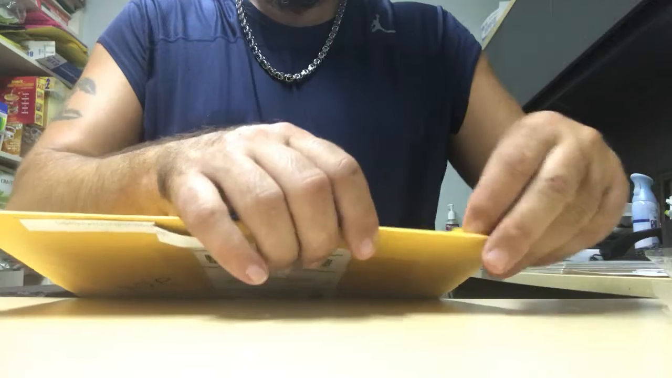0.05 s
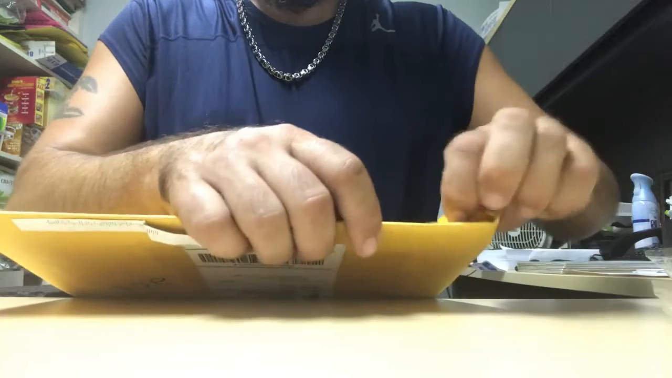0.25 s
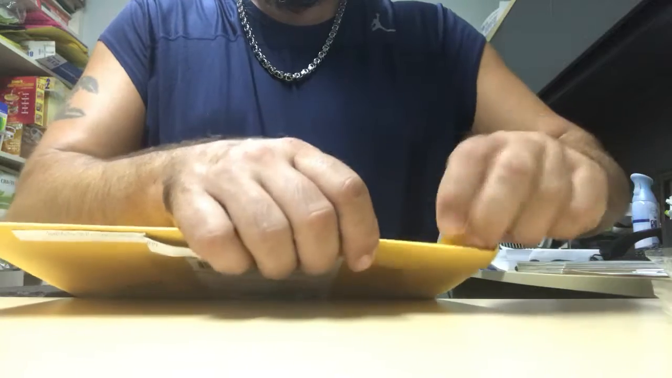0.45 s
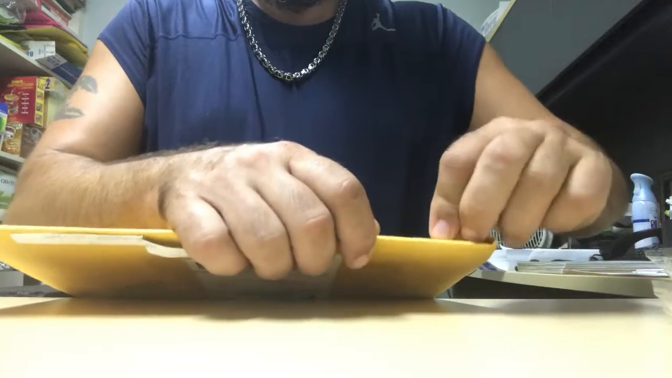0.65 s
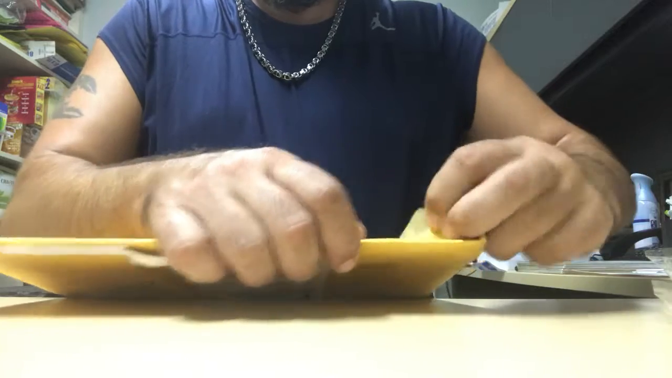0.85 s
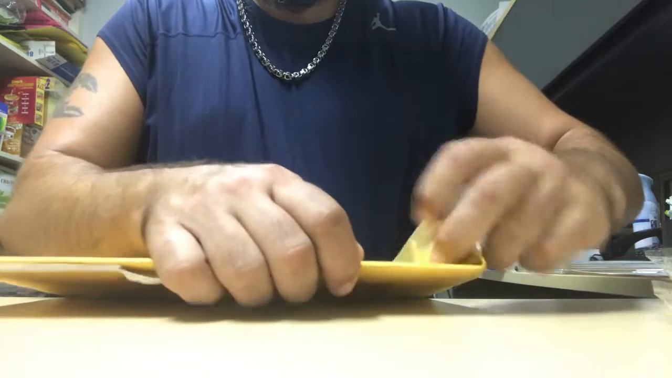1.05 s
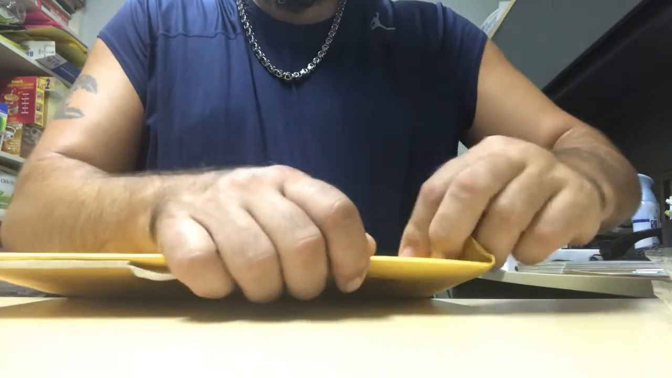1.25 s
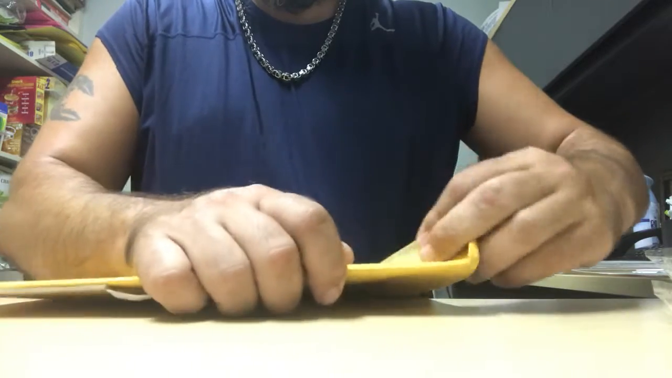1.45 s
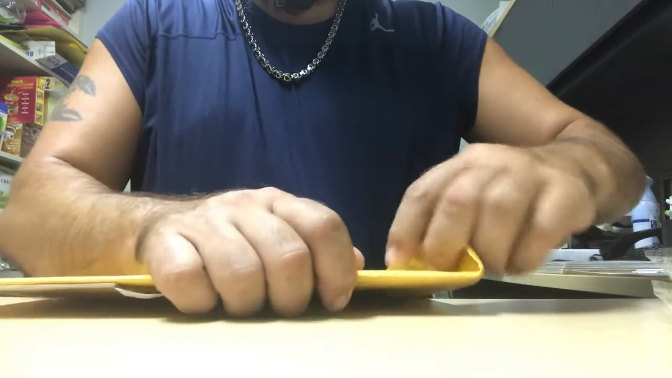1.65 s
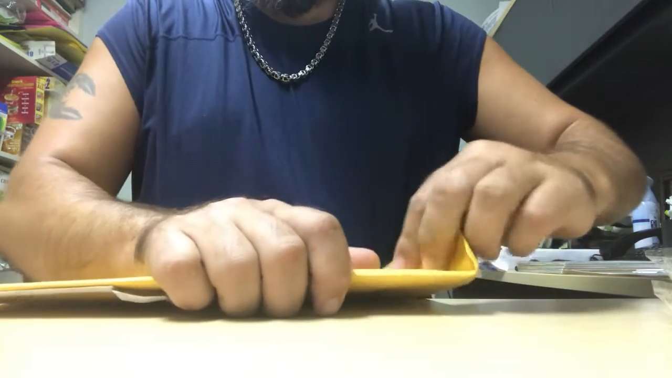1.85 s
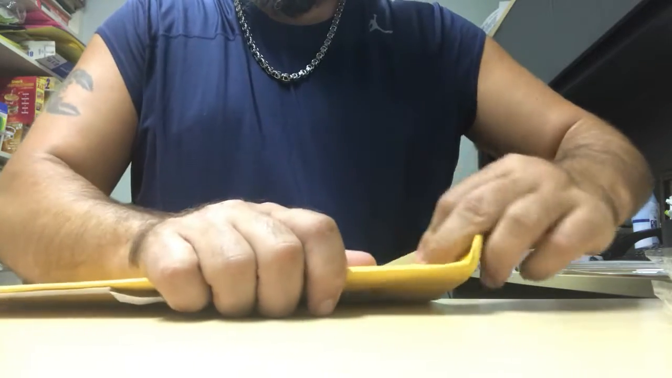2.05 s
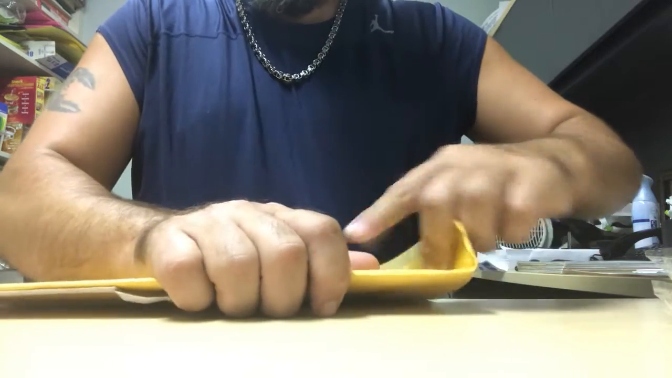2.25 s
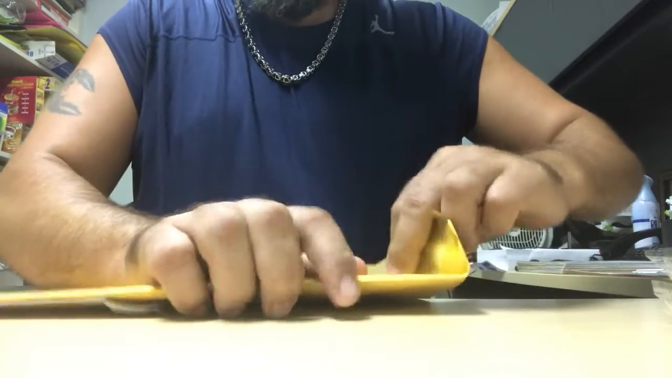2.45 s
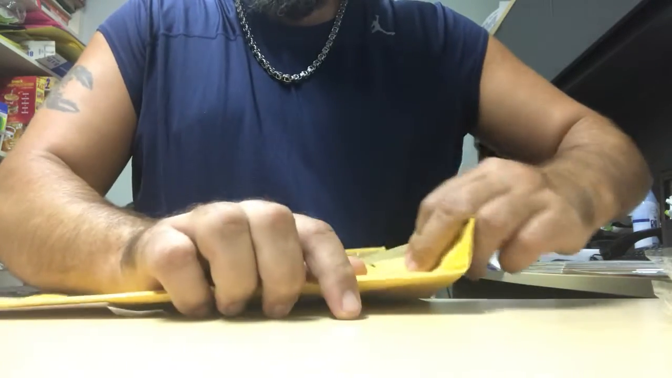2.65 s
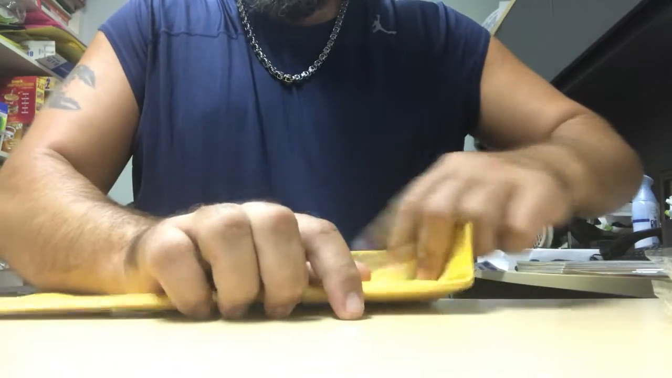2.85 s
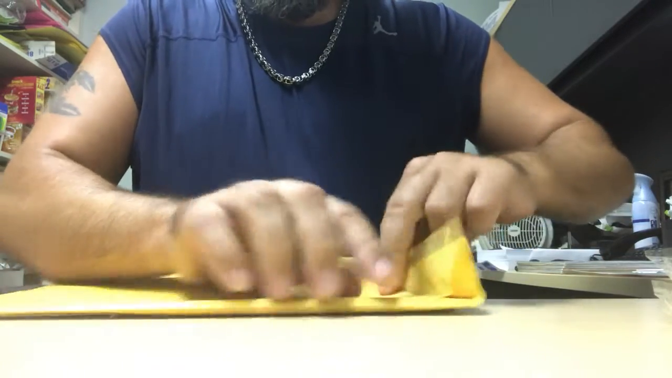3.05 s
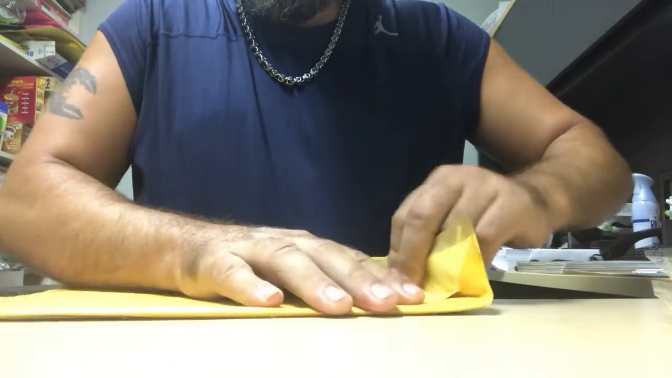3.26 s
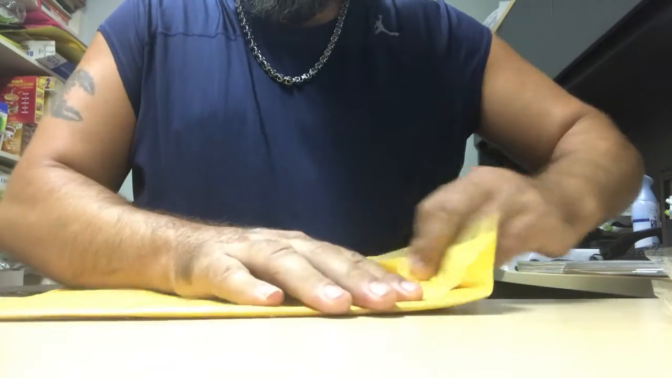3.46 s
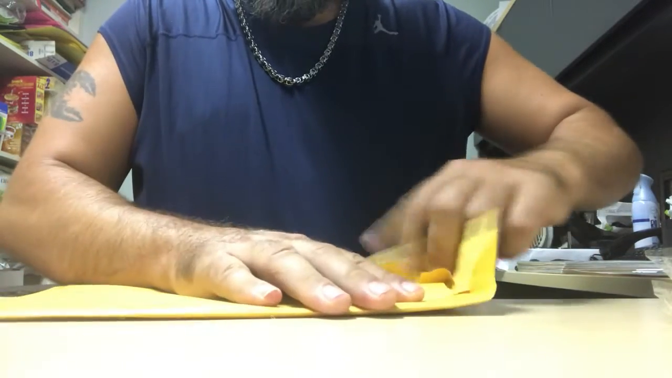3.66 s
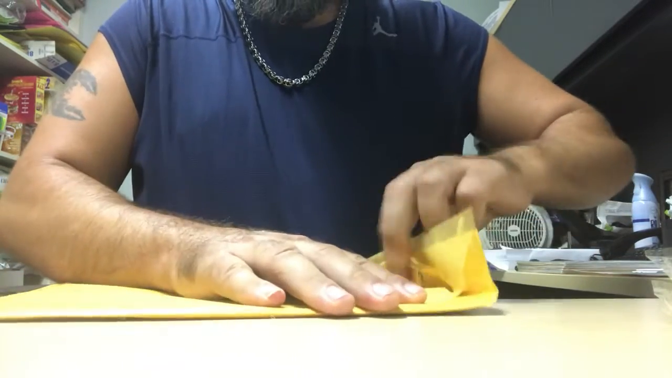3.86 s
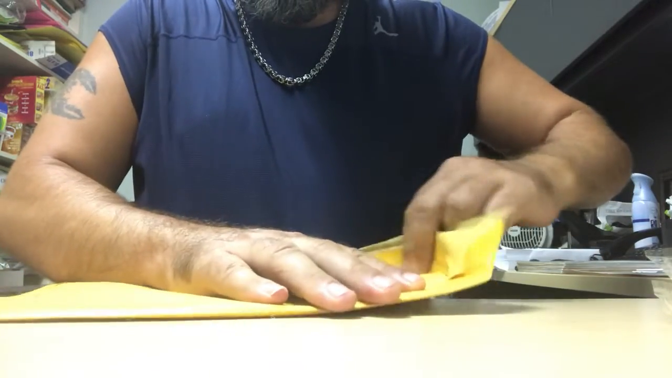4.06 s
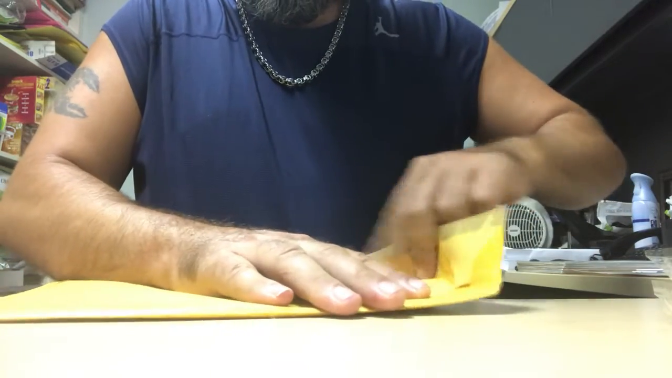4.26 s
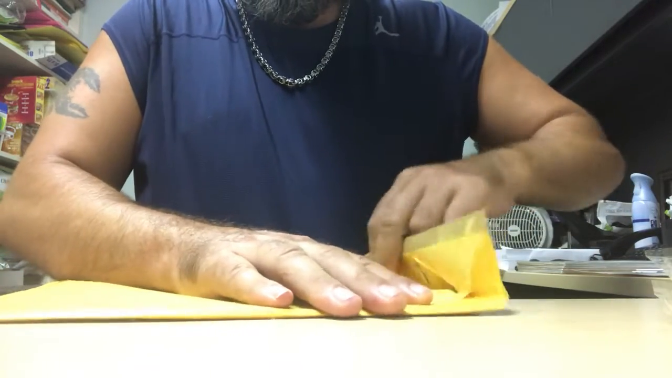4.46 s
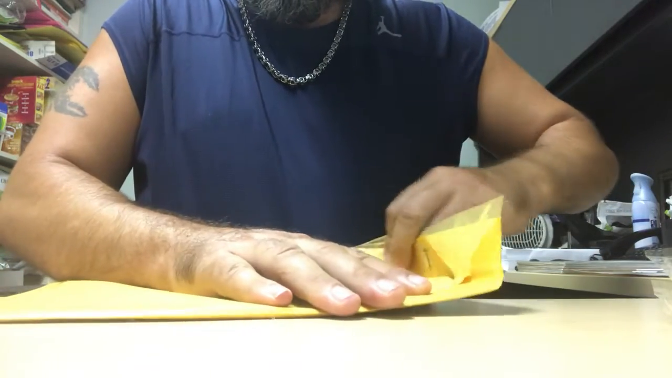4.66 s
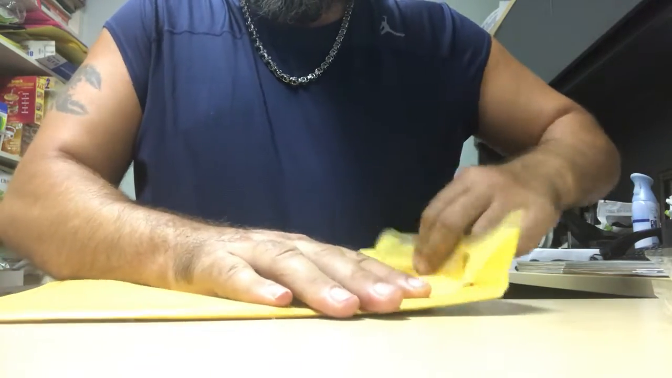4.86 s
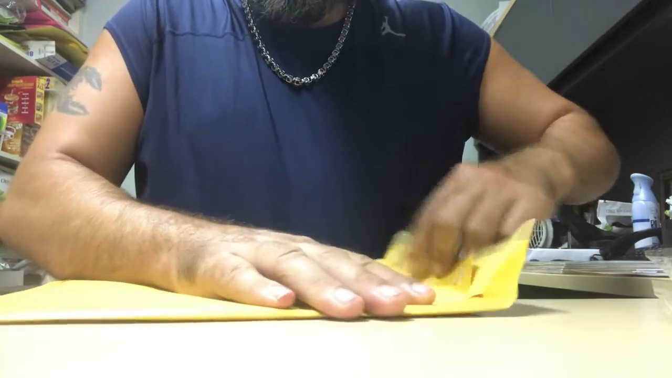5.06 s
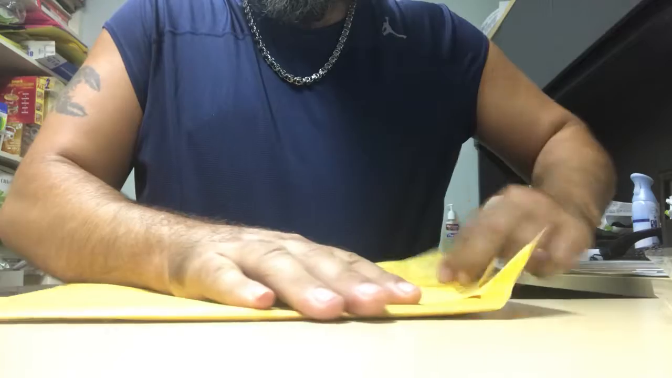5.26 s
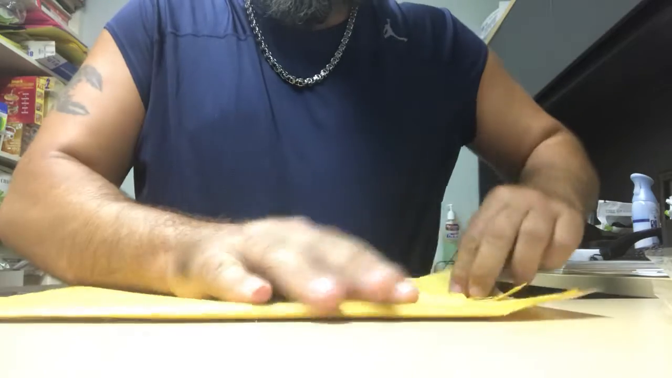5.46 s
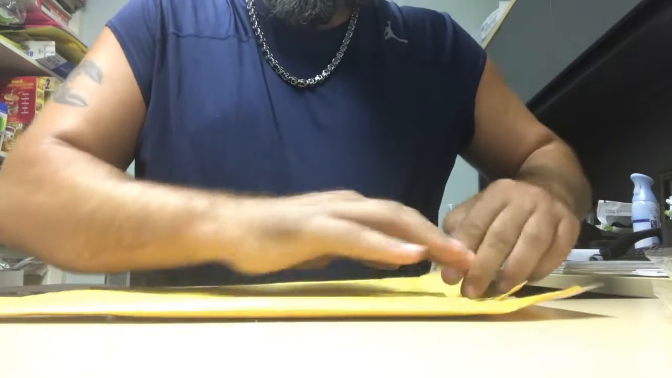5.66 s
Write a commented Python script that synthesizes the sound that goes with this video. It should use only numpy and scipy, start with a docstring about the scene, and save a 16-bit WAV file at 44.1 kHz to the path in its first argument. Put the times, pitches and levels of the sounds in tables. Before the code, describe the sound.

Close, dry sound of stiff padded paper being ripped in fits and starts. Bright brittle snaps, raspy tearing strokes and airy rustle come in uneven clusters, separated by near-quiet moments. Soft low bumps of padding against the desk become stronger in the second half. Thin hiss is present only at the beginning; faint low room rumble remains throughout. The loudest snaps are slightly rounded by the small microphone.

```python
"""Tearing a padded envelope

Hands tear open a padded paper envelope on a desk, close to a small microphone. Creases snap as clicks
with dying spatter that ring the stiff sheet; fibres part as clumped clicks over noise, making rasp,
rustle and fizz; the padding knocks the desk as short swelling tones. A small room answers snaps and
knocks with a diffuse tail; under it all lie a steady low room rumble and, at the start, a thin hiss."""
import sys
import numpy as np
from scipy import signal
from scipy.fft import rfft, irfft
from scipy.io import wavfile
from scipy.ndimage import uniform_filter1d

SR = 44100
rng = np.random.default_rng(int(sys.argv[2]) if len(sys.argv) > 2 else 0)


def master_out(mix):
    """Clip the mix to full scale and print it as 16-bit PCM to the path in sys.argv[1]."""
    frames = np.transpose(np.atleast_2d(mix))
    ceiling = np.clip(frames, -1, 1)
    pcm = np.round(ceiling * 32767).astype(np.int16)
    wavfile.write(sys.argv[1], SR, pcm)


N = 251811
T = np.arange(N) / SR


def undb(db):
    """Amplitude ratio of a level in dB."""
    return 10 ** (np.asarray(db) / 20)


def unit(x):
    """Scales to an RMS of 1."""
    return x / np.sqrt(np.mean(x ** 2))


def band_filter(lo_hz, hi_hz, order=2):
    """Butterworth band-pass sections."""
    return signal.butter(order, [lo_hz, min(hi_hz, .45 * SR)], "band", fs=SR, output="sos")


def band(x, lo_hz, hi_hz, order=2):
    """Band-passes a signal."""
    return signal.sosfilt(band_filter(lo_hz, hi_hz, order), x)


def colour(x, points):
    """Causal filter through (f/Hz, gain/dB) points, from the cepstrum of the log gain."""
    size = 2048
    hz, db = np.transpose(points)
    f_hz = np.maximum(np.fft.rfftfreq(size, 1 / SR), 1)
    log_gain = np.interp(np.log(f_hz), np.log(hz), db) * np.log(10) / 20
    cepstrum = irfft(log_gain)
    # folding onto positive times gives minimum phase
    cepstrum[1:size // 2] *= 2
    cepstrum[size // 2 + 1:] = 0
    impulse = irfft(np.exp(rfft(cepstrum)))
    return signal.fftconvolve(x, impulse)[:len(x)]


# hiss bands: [f/Hz, width/Hz, level/dB]
HISS_BANDS = [(2180, 180, -57), (3900, 240, -62), (6430, 480, -55), (8500, 1300, -63)]
HISS_END_S, HISS_FADE_S = .745, 0.0052


def background():
    """Thin hiss: noise in narrow bands, faded out quickly at HISS_END_S."""
    hiss = np.zeros(N)
    for hz, width_hz, db in HISS_BANDS:
        noise = rng.standard_normal(N)
        hiss += undb(db) * unit(band(noise, hz - width_hz / 2, hz + width_hz / 2, order=1))
    return hiss * np.clip((HISS_END_S - T) / HISS_FADE_S, 0, 1)


ROOM_T60_S, ROOM_BUILD_S, ROOM_DB = 0.12, 0.0045, -15


def room(x):
    """Desk and near walls: a short diffuse tail that builds over some ms."""
    t = np.arange(SR // 3) / SR
    decay = np.exp(-np.log(1000) * t / ROOM_T60_S)
    tail = rng.standard_normal(len(t)) * decay * np.clip(t / ROOM_BUILD_S, 0, 1)
    return undb(ROOM_DB) * signal.fftconvolve(x, tail / np.sqrt(np.sum(tail ** 2)))[:N]


# colour of moving paper: [f/Hz, gain/dB]
PAPER_COLOUR = [(40, -12.5), (150, -7.5), (300, -9), (380, 0.5), (500, -3), (1100, 2), (1500, -2.5),
                (3000, -5.5), (4500, -4.5), (5200, -10.5), (6800, -7), (8500, -9), (10500, -1.5),
                (14000, -14), (16500, -13)]


def click_grain(clicks_per_s, scatter_db, clump_db, smooth):
    """Tiny clicks of uneven size, as of parting fibres, over noise, swelling together in clumps."""
    hold = SR // 150
    steps = np.repeat(rng.standard_normal(N // hold + 1), hold)[:N]
    clumps = uniform_filter1d(steps, hold // 2)
    sizes = undb(scatter_db * rng.exponential(size=N)) * rng.choice([-1, 1], N)
    clicks = unit(sizes * (rng.random(N) < clicks_per_s / SR))
    grain = clicks + smooth * rng.standard_normal(N)
    return colour(grain * undb(clump_db * clumps), PAPER_COLOUR)


def layers(grain, gains):
    """Splits paper noise into mid rasp, low rustle and high fizz, each under its own gain."""
    rasp_gain, rustle_gain, fizz_gain = gains
    rasp = rasp_gain * unit(band(grain, 1220, 8150))
    rustle = rustle_gain * unit(band(grain, 330, 1610, order=1))
    fizz = fizz_gain * unit(band(grain, 9870, 15700))
    return rasp + rustle + fizz


# steady low room rumble, slightly louder from about 3 s: [t/s, level/dB]
RUMBLE_LEVEL = [(0, -51), (2, -51), (3, -48), (5.71, -49.5)]


def room_rumble():
    """Steady low room tone: grainy noise kept to the bass."""
    rumble = unit(band(click_grain(1500, 3.2, 0.65, 1.1), 31, 254))
    return undb(np.interp(T, *np.transpose(RUMBLE_LEVEL))) * rumble


# how busy the hands keep the sheet between strokes: [t/s, crinkle level/dB]
CRINKLE_LEVEL = [(0, -50), (.72, -70), (.84, -37), (1.0, -40), (1.12, -69), (1.2, -79), (1.31, -40.5),
                 (1.5, -48), (1.57, -55.5), (1.64, -44), (1.69, -61), (1.8, -65), (1.92, -36), (2.12, -41),
                 (2.19, -57), (2.42, -47.5), (2.62, -39), (2.72, -40.5), (2.8, -45.5), (2.91, -46),
                 (3.06, -45.5), (3.39, -42.5), (3.55, -48), (3.86, -49), (3.9, -56.5), (4.08, -39),
                 (4.21, -54), (4.52, -40.5), (4.76, -37.5), (4.93, -48.5), (5.03, -40.5), (5.37, -54.5),
                 (5.44, -45.5), (5.53, -54), (5.6, -53), (5.71, -52)]
# rustle and fizz follow the crinkle: level at MIDDLE_DB, then slope
MIDDLE_DB = -50
RUSTLE_DB, RUSTLE_DB_PER_DB = -46.5, 0.22
FIZZ_DB, FIZZ_DB_PER_DB = -54, 0.76


def crinkle():
    """Sheet crinkling between strokes: sparser, clumpier clicks than the tear."""
    busy_db = np.interp(T, *np.transpose(CRINKLE_LEVEL))
    rustle_db = RUSTLE_DB + RUSTLE_DB_PER_DB * (busy_db - MIDDLE_DB)
    fizz_db = FIZZ_DB + FIZZ_DB_PER_DB * (busy_db - MIDDLE_DB)
    return layers(click_grain(2000, 3.0, 3.0, 0.88), (undb(busy_db), undb(rustle_db), undb(fizz_db)))


# tearing and sliding strokes:
# [start t/s, end t/s, first level/dB, last level/dB, rustle re rasp/dB, fizz re rasp/dB]
STROKES = [(0.475, 0.5, -61, -46.5, 8, -8), (0.603, 0.619, -37, -37, -3.5, -10),
           (0.74, 0.803, -33, -48, -1, -5), (0.852, 0.903, -34, -24, -9.5, -13),
           (0.906, 0.965, -33, -32, -12, -8), (1.199, 1.214, -44, -50, 0, -7),
           (1.326, 1.389, -33, -26, -12, -8), (1.394, 1.489, -23.5, -39, -24, -5),
           (1.818, 1.817, -34, -29.5, -7, -10), (1.941, 2.02, -33, -36.5, -13, -3),
           (2.042, 2.113, -33, -48, -26, -4), (2.231, 2.255, -23.5, -31.5, -8, -9),
           (2.332, 2.373, -42.5, -58, 10.5, -3), (2.556, 2.609, -21, -47.5, -16, -8),
           (2.59, 2.734, -39.5, -40, -13, -5), (2.872, 2.905, -18, -48, -3, -31),
           (3.183, 3.222, -51, -60.5, 19, 1), (3.297, 3.36, -38.5, -50, -5, -10),
           (3.413, 3.491, -25.5, -23, -9, -6.5), (3.67, 3.721, -71, -40, -4, -9),
           (3.792, 3.837, -35, -45, -7.5, -8), (4.008, 4.064, -27.5, -44.5, 6.5, -5),
           (4.231, 4.313, -35, -45.5, 0.5, -4), (4.546, 4.576, -39, -51, 12.5, -3),
           (4.612, 4.656, -26.5, -38.5, 4.5, -5), (4.669, 4.721, -38, -40, 10, -3),
           (4.807, 4.876, -25, -34, 0, -6), (4.958, 4.983, -34, -50, 11, -10),
           (5.057, 5.179, -27, -32, -5.5, -7), (5.267, 5.308, -52, -31.5, -1, -3),
           (5.305, 5.357, -29, -47.5, 4, -8), (5.629, 5.652, -57, -37, 12, -7)]


def strokes():
    """Gains of rasp, rustle and fizz: each stroke glides in dB between quick edges."""
    gains = np.zeros((3, N))
    for start_s, end_s, first_db, last_db, rustle_db, fizz_db in STROKES:
        attack = np.clip((T - start_s) / 0.0048, 0, 1)
        release = np.clip((end_s - T) / 0.017 + 1, 0, 1)  # begins at end_s
        level = undb(np.interp(T, [start_s, end_s], [first_db, last_db]))
        gains += attack * release * level * undb([[0], [rustle_db], [fizz_db]])
    return gains


def tearing():
    """Paper tearing: dense, even fibre clicks under the strokes."""
    return layers(click_grain(5000, 2.5, 1.6, .8), strokes())


# padding knocking on the desk: [t/s, peak level/dB, f/Hz]
KNOCKS = [(.63, -37, 75), (.895, -41, 70), (1.043, -39, 170), (1.088, -39, 65), (1.703, -31, 180),
          (2.035, -29, 180), (2.238, -32.5, 90), (2.551, -30, 130), (2.875, -18.5, 175), (3.03, -40, 80),
          (3.2, -40, 80), (3.453, -22, 170), (3.67, -22.5, 150), (3.675, -34, 55), (4.013, -26, 355),
          (4.286, -30, 110), (4.546, -34, 355), (4.613, -19.5, 355), (4.615, -30, 90), (4.663, -34, 200),
          (4.69, -32, 190), (4.86, -32, 190), (4.715, -40, 80), (4.799, -15, 355), (4.802, -27, 100),
          (4.965, -16.5, 340), (4.978, -26.5, 70), (5.085, -38, 70), (5.185, -30.5, 150), (5.33, -32.5, 75),
          (5.65, -27, 150), (5.65, -27, 300), (5.67, -35, 50)]
# times hold at KNOCK_HZ; they scale with sqrt(KNOCK_HZ / f)
KNOCK_RISE_MS, KNOCK_FADE_MS, KNOCK_HZ = 3, 4.4, 175


def knocks():
    """Soft blows on the desk: tones that swell and die in some ms, lower ones more slowly."""
    size = SR // 5
    out, t = np.zeros(N + size), np.arange(size) / SR
    for (s, db, hz), turn in zip(KNOCKS, rng.random(len(KNOCKS))):
        scaled_ms = 1000 * t * np.sqrt(hz / KNOCK_HZ)
        shape = (1 - np.exp(-scaled_ms / KNOCK_RISE_MS)) ** 2 * np.exp(-scaled_ms / KNOCK_FADE_MS)
        tone = np.sin(2 * np.pi * (hz * t + turn))
        i = int(s * SR)
        out[i:i + size] += undb(db) * shape / shape.max() * tone
    return out[:N]


EDGE_DB, EDGE_DB_PER_DB = -2.5, 1.2  # top band re snap; its slope on sharpness
THUMP_DB = -24  # desk thump re body


def snap_levels(db, weight_db, sharp_db):
    """Band peaks in dB: body, crack, crisp, edge, thump."""
    body_db = db + weight_db
    edge_db = db + EDGE_DB + EDGE_DB_PER_DB * sharp_db
    return [body_db, db, db + sharp_db, edge_db, body_db + THUMP_DB]


# short rings of sheet and desk: [f/Hz, width/Hz, level re plain snap/dB]
SHEET_RINGS = [(179, 47, -7), (369, 52, 8.5), (615, 130, 4), (1000, 900, 13), (6720, 770, -8),
               (9340, 1150, 7.5), (13300, 17000, 0.5)]


def ring(x, lo_hz, hi_hz, crease_hz):
    """Adds the resonances inside a band, sheet's and crease's, each varied in pitch and strength."""
    out = x
    for hz, width_hz, db in SHEET_RINGS + [(crease_hz, 0.19 * crease_hz, 4)]:
        shift, strength = rng.standard_normal(2)
        if lo_hz < hz < hi_hz:
            f_hz = hz * np.exp(.03 * shift)
            b, a = signal.iirpeak(f_hz, f_hz / width_hz, fs=SR)
            out = out + undb(db + 2.5 * strength) * signal.lfilter(b, a, x)
    return out


# creases snapping: [t/s, peak level/dB, body re peak/dB, sharpness/dB, length before stretch/ms, crease f/Hz]
CREASES = [(.0672, -58, -10, 14, .4, 5500), (.1266, -48, -12, 13, .4, 5500), (.1735, -37, -9, 4, .4, 3500),
           (.2039, -34, -15, 3, 0.34, 3600), (.2483, -37.5, -15, 3, .4, 5530),
           (.2668, -34, -11, 1, .4, 3600), (0.2776, -28, -12, 2, 1.4, 3600),
           (.2987, -18.5, -11, -8, 0.54, 3420), (0.3194, -29, -13, 1, .7, 3550),
           (.3612, -36.5, -13, 7, .39, 5490), (0.4085, -3, -8.5, -7, 0.48, 3840),
           (.638, -29, -1, -16, 1.5, 1310), (0.7444, -8, -11.5, 4, 0.65, 2800),
           (0.7503, -11, -6, 5, 1.9, 3920), (.8086, -6, -10.5, -1.5, 0.9, 3763),
           (.871, -14, -8.5, 2, 3.3, 3700), (0.8793, -10.5, -4.5, -1, 1.3, 3500),
           (0.8995, -7.5, -8, 4, 1, 4460), (0.934, -12, -5, 4.5, 1.55, 2420),
           (.9378, -11.5, -8.5, 1, 1.2, 3300), (1.043, -18.5, -1, 4.5, 2.5, 5700),
           (1.0798, -30, -3, -3, 1.2, 3640), (1.2154, -26.5, -23, 7, .24, 4540),
           (1.4002, -14, -5.5, 1, 1.2, 2870), (1.4128, -8, -26, -15, 0.82, 2350),
           (1.4239, -7, -5, 2, 1.4, 3400), (1.4456, -4, -12, 1.5, 1.66, 3600),
           (1.546, -32.5, 5, -13, 2.4, 1820), (1.598, -24, -3, -0.5, 0.53, 1330),
           (1.6583, -22.5, -3.5, -1, 4.4, 3320), (1.6894, -25, -2, -16, 1.9, 2300),
           (1.7043, -11, -2, 6.5, 1.4, 1960), (1.7865, -39, -14, 4, .4, 4500),
           (1.926, -29.5, -4, -14, 1.2, 1500), (1.9514, -4, -9.5, 0.5, 1.1, 2960),
           (1.9882, -1, -10, -3, 0.76, 2980), (2.0338, 1.1, -16.5, -3, 0.78, 3200),
           (2.0581, -23, 5, 0, 1.35, 1390), (2.169, -31, -16, -16, 2.1, 1590),
           (2.214, -27, 0, -19, 5, 3380), (2.241, -5, -7.5, -3, 0.73, 1620),
           (2.3626, -18.5, -4.5, -6, 1.3, 1390), (2.4083, -37, -3, 10, .5, 5280),
           (2.4454, -17.5, -4, 2.5, 1.2, 2340), (2.4723, -29.5, 5.5, -4, 2, 3360),
           (2.5499, -4.5, -10, 2.5, 1.1, 4170), (2.5805, -22.5, -2, 9, 0.62, 1310),
           (2.766, -16.5, -4, -4.5, 0.77, 1300), (2.8446, -25, -2, 7, 0.78, 1450),
           (2.8546, -21, -21, 4, .59, 3950), (2.8757, -5.5, -6, -7, 2.2, 1440),
           (2.9302, -26.5, 4, -18, 0.72, 1310), (3.0209, -14, -5.5, -3, 2.7, 2130),
           (3.0311, -20.5, 1, 12, 0.46, 2320), (3.1078, -26.5, -4, -8, 1.2, 2320),
           (3.2952, -14.5, -8.5, 5.5, 1, 2230), (3.3026, -10, -11.5, 4, 1.4, 2220),
           (3.3343, -7, -16, 2.5, 0.84, 1390), (3.3654, -31, -13, 13, 1.4, 5300),
           (3.3813, -25, -11, 9, 7.7, 1970), (3.412, -8, -12, -8, 1.8, 3840),
           (3.4241, -1, -8, -2.5, 0.87, 1500), (3.433, -9, -21, 3, 0.73, 2470),
           (3.455, -4, -4.5, 1.5, 2.6, 2220), (3.4764, -12.5, -3, 4, 3.6, 2880),
           (3.4869, -24.5, 5, 15, 0.62, 4560), (3.4932, -10.5, -12, -12, 1.5, 1740),
           (3.5054, -10, 1, -5, 0.61, 1330), (3.514, -12.5, 2, -4, 2.9, 1360),
           (3.5654, -13, -2, -4, 1.2, 1290), (3.602, -18, -10, -16, 0.66, 1390),
           (3.6239, -27, -6, 7, 0.61, 1670), (3.6619, -24, -15, 10, 0.25, 4480),
           (3.669, -4.5, -3, 1.5, 1.3, 2130), (3.7238, -30.5, -2, 2, 1.5, 2500),
           (3.8128, -20.5, -3, -4, 1.4, 2520), (3.8279, -20, -7, -14, 0.9, 3720),
           (3.839, -27, -1, -8, 1.1, 1310), (3.9347, -44, 18, -11, .7, 1310),
           (3.9559, -23, 0.5, 3, 2.9, 2570), (4.003, -7, -15, -2, 0.71, 1820),
           (4.0123, -1, -0.5, -5.5, 0.97, 1230), (4.071, -21.5, -2.5, -8, 1, 1310),
           (4.1123, -17, 4, -22, 0.78, 1720), (4.1338, -20, -15, -16, 1.3, 1590),
           (4.1584, -25.5, -1, 8, 2.2, 2930), (4.2367, -11, 0, 0.5, 0.79, 1300),
           (4.262, -26, -4, 4, 3.1, 4670), (4.2739, -14.5, 4, 3, 0.56, 1610),
           (4.2852, -18.5, 1.5, 5.5, 3.4, 1290), (4.3765, -19, -8.5, -10, 0.64, 1830),
           (4.4202, -44, -6, 12, .34, 5490), (4.48, -24, -11, -8, .35, 1800),
           (4.4962, -24, -5.5, 2.5, 0.81, 3280), (4.5457, -4.5, -2, -11, .91, 1160),
           (4.614, 0.1, -5.5, -5, 0.64, 3200), (4.6562, -13, -23, -9, 0.44, 3734),
           (4.6624, -7, 0.5, 2.5, 1.3, 4300), (4.6698, -7, -1.5, -25, 1.06, 1366),
           (4.7676, -23.5, -3, -16, 1.3, 1540), (4.7892, -23.5, 1, 2, 9.6, 1890),
           (4.801, -5, -1, -2, 1.8, 1900), (4.8269, -20, -2, -21, 2.5, 2130),
           (4.9483, -26.5, -5, -3, 2.6, 2670), (4.964, -11.5, -1.5, 2, 2, 1900),
           (4.969, -12, -2.5, 2, 3, 1300), (5.0156, -24, -20, 0, 0.48, 4670),
           (5.3103, -3, -27, 4.5, .26, 4040), (5.4155, -35, 4.5, -9, 1, 2500),
           (5.556, -38, -10, 5, .5, 4500), (5.5731, -20, -0.5, -2, 0.79, 2740),
           (5.6268, -34.5, 13.5, -4, 0.87, 1333), (5.6483, -17, 0.5, 3, 0.86, 1520),
           (5.6883, -21, -2, -12, 1.3, 1310)]
# bands in which the sheet carries a snap, bass later and longer:
# [low f/Hz, high f/Hz, delay/ms, stretch of length (ratio)]
SHEET_BANDS = [(340, 1400, 0.44, 2.76), (1353, 3830, 0.039, 1.41), (4043, 8100, 0.015, 0.93),
               (8150, 15400, 0.06, 0.83), (90, 235, 1.34, 4.9)]
LEAD_MS = 3  # room for the creak ahead of the break


def snaps():
    """Creases giving way: a faint creak, one click, then a dying spatter that the sheet spreads out."""
    size = 2048
    out, ms = np.zeros(N + size), np.arange(size) * 1000 / SR
    filters = [band_filter(lo, hi) for lo, hi, _, _ in SHEET_BANDS]
    for s, peak_db, weight_db, sharp_db, length_ms, crease_hz in CREASES:
        levels_db = snap_levels(peak_db, weight_db, sharp_db)
        spatter = rng.standard_normal(size) * undb(6.25 * rng.standard_normal(size))
        i = int((s - LEAD_MS / 1000) * SR) - 6
        for sos, db, (lo, hi, delay_ms, stretch) in zip(filters, levels_db, SHEET_BANDS):
            break_ms = LEAD_MS + delay_ms
            late_ms = np.maximum(ms - LEAD_MS - delay_ms, 0)
            creak = 0.39 * np.exp(-np.abs(ms - LEAD_MS) / 0.37) * (ms < break_ms)
            rise = 1 - np.exp(-late_ms / (delay_ms + 0.067))
            decay = np.exp(-late_ms / (max(length_ms, .3) * stretch))
            push = spatter * (creak + rise * decay)
            # narrower bands need a stronger click to stand out
            push[int(break_ms * SR / 1000)] = 2.7 * np.sqrt(SR / (hi - lo)) / 2
            sound = ring(signal.sosfilt(sos, push), lo, hi, crease_hz)
            out[i:i + size] += undb(db) * sound / np.abs(sound).max()
    return out[:N]


# dips and lifts that desk and microphone port put on a snap: [f/Hz, gain/dB]
PORT_COLOUR = [(30, 24), (80, 3), (500, -4.5), (1100, 2), (1800, 2.5), (3200, 3), (5200, 4), (7000, 0.5),
               (10500, -5), (14000, -1)]


def scene():
    """Snaps and knocks with their room, over paper noise, room rumble and hiss."""
    cracks = colour(snaps(), PORT_COLOUR) + knocks()
    paper = tearing() + crinkle()
    return (background() + room_rumble() + room(cracks) + paper + cracks)[None]


TOP_HZ = 15800


def record(dry):
    """The microphone cuts both ends and rounds the loudest peaks."""
    dry = signal.sosfilt(signal.butter(2, 45, "high", fs=SR, output="sos"), dry)
    soft = .97 * np.tanh(dry / .97)
    return signal.sosfilt(signal.ellip(8, .2, 60, TOP_HZ, fs=SR, output="sos"), soft)


dry = scene()
out = record(dry)
master_out(out)
```